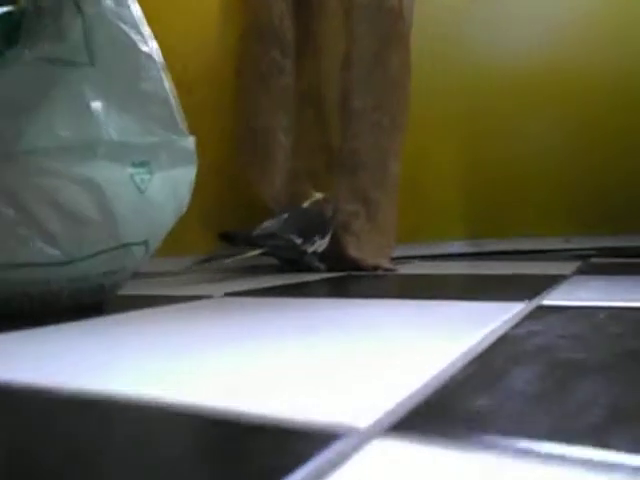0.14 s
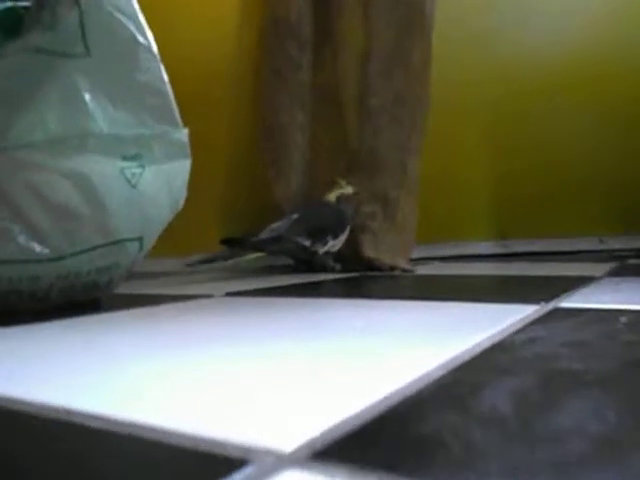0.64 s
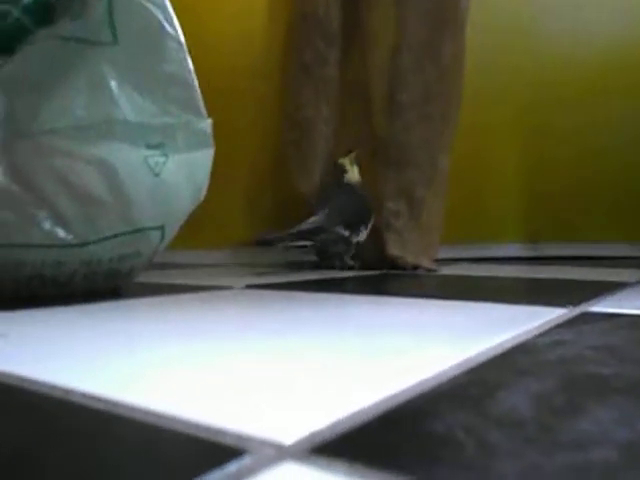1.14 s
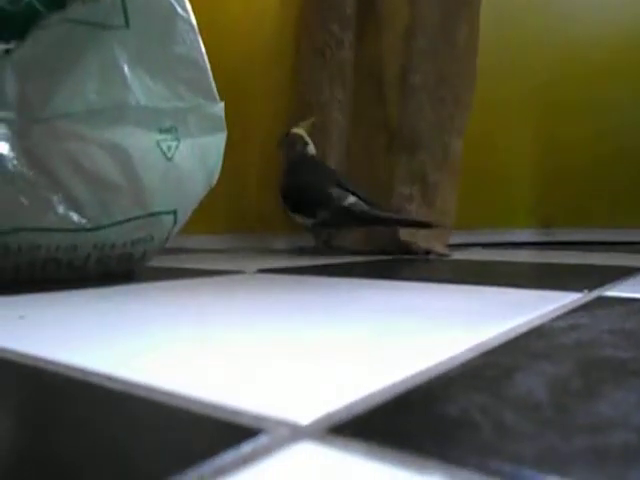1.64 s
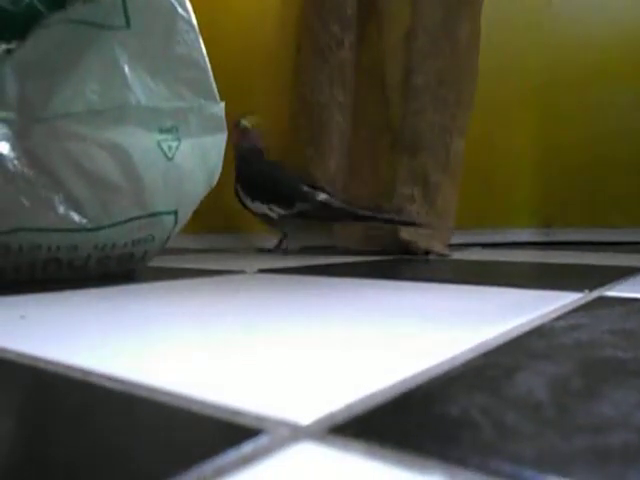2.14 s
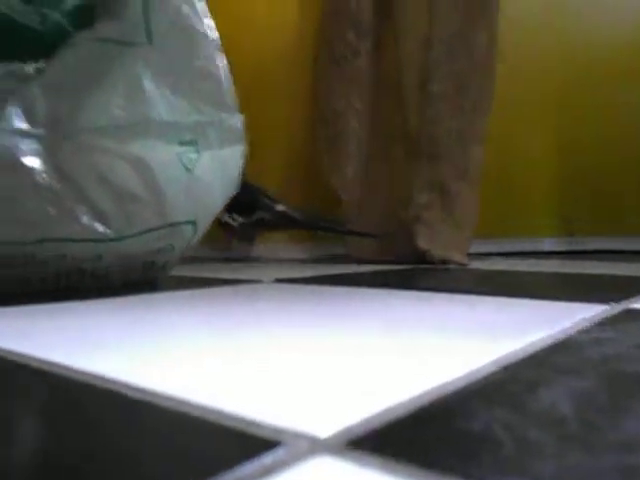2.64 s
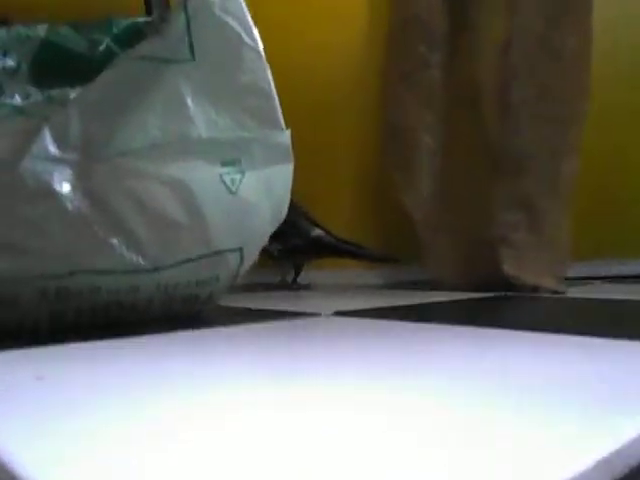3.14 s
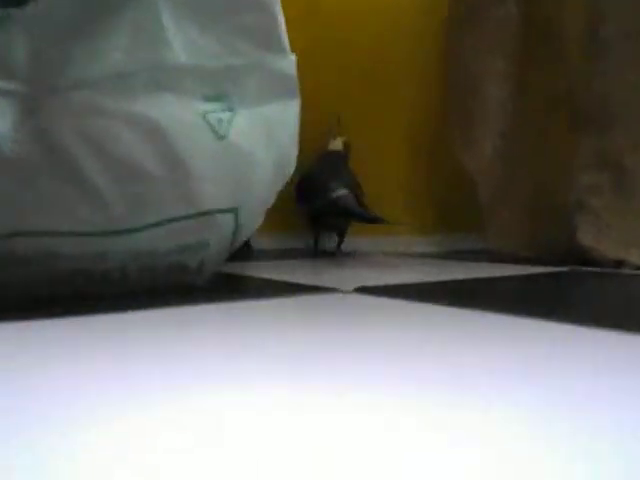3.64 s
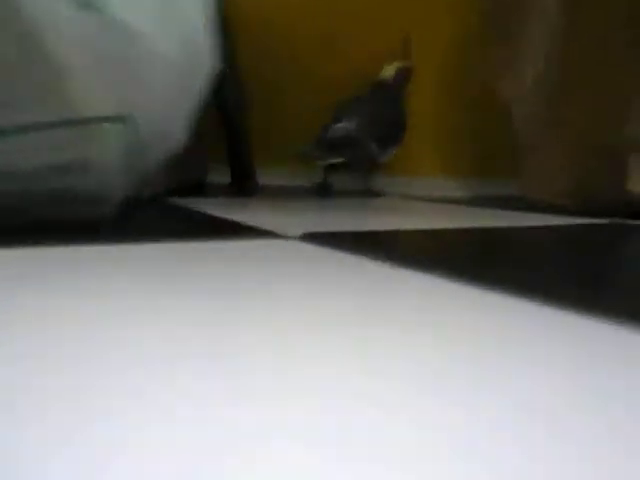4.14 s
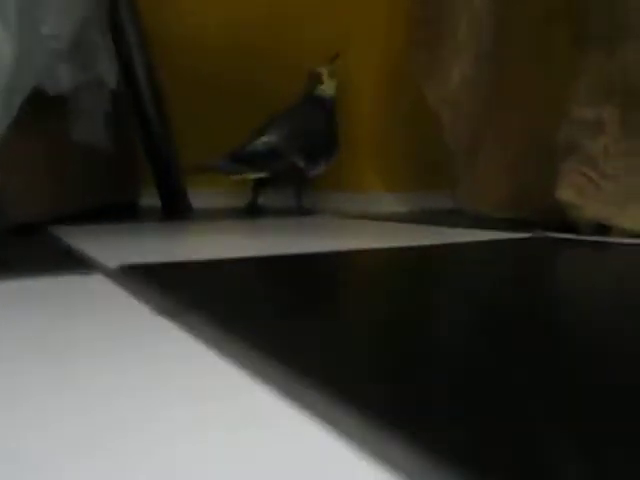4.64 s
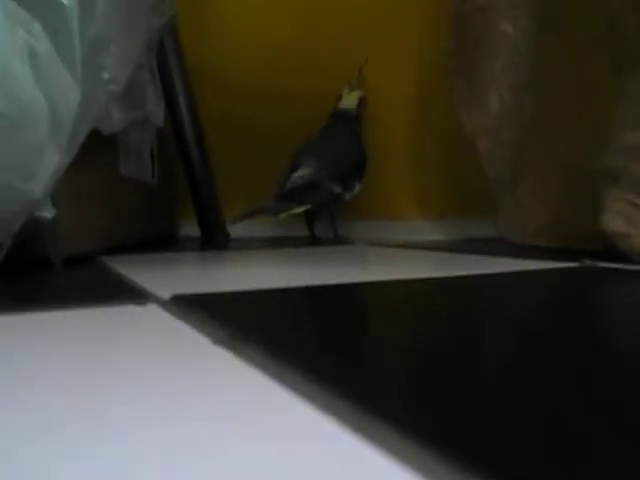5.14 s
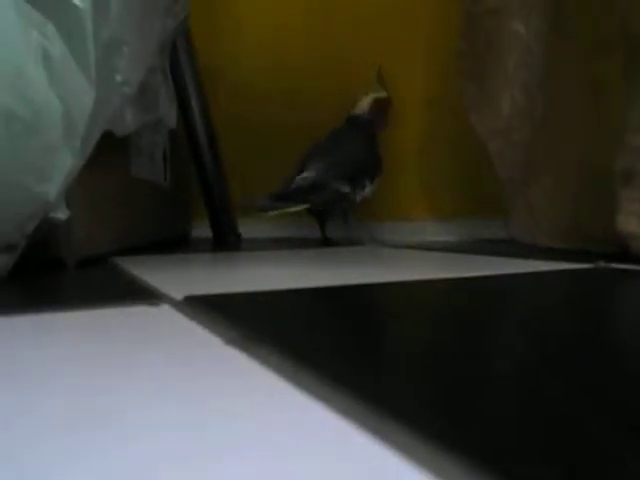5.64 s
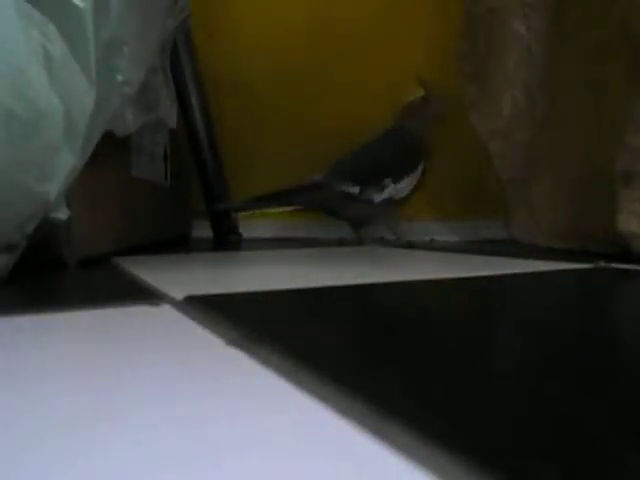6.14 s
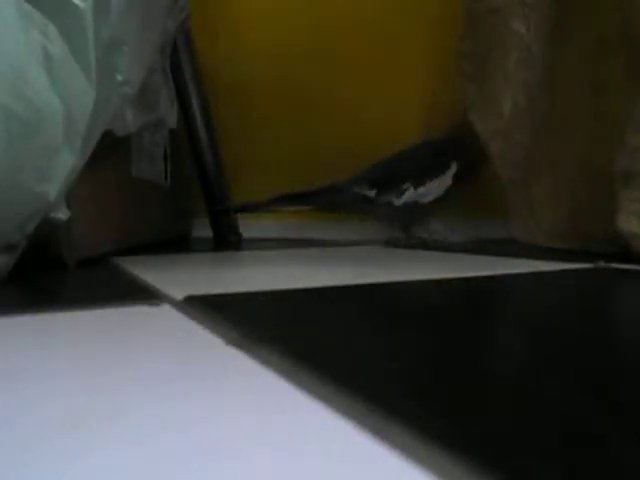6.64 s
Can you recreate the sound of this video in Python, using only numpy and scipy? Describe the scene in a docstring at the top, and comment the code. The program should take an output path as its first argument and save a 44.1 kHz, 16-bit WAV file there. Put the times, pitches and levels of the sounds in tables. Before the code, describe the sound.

A small, hard-walled tiled room with steady soft hiss, low rumble and a faint mains hum near 120 Hz. From 0.1 to 0.8 s light claw ticks and scratches patter, with small scuffs; a soft knock comes at about 1.25 s and a fainter one at 1.5 s. At 2.02 s the bird gives one shrill, hoarse call of about 0.2 s, gliding up from roughly 1.9 to 3 kHz and back down, with a brief bright echo. From 2.75 s the camera case scuffs, with a short stuttering burst of knocks around 3.0 s and bumps at 3.35 to 3.45 s. From 4.0 to 4.7 s it drags in loud, close, woody-plastic judders, sticking and slipping with brief pauses. Then it is quiet: weak rubs, a scuff and thin squeak around 5.3 to 5.55 s, and sparse faint claw ticks until 6.7 s.

```python
"""The case of a small camera is nudged and dragged by hand over a tiled floor: it scuffs, sticks and slips.
Slips are short pushes that ring damped case modes; scuffs, a faint squeak and rubbing fill in around them.
A pet bird patters over the tiles, its claws scraping in short bursts of the same case modes, and gives one
shrill call of gliding hoarse partials that rings in the bare room. Mains hum and coloured hiss lie under it."""
import sys
import numpy as np
from scipy import signal
from scipy.fft import rfft, irfft, next_fast_len
from scipy.io import wavfile
from scipy.ndimage import uniform_filter1d

SR = 44100
rng = np.random.default_rng(int(sys.argv[2]) if len(sys.argv) > 2 else 0)


def voltage_ratio(decibels):
    """Convert decibels (scalar or array-like) to amplitude ratios, 20 dB per decade."""
    exponent = np.asarray(decibels, float) / 20
    return 10 ** exponent


def waveform_to_disk(signal):
    """Save audio, clipped to [-1, 1], as 16-bit WAV at the path in sys.argv[1]."""
    frames = np.transpose(np.atleast_2d(signal))
    scaled = np.clip(frames, -1, 1) * 32767
    samples = np.round(scaled).astype(np.int16)
    wavfile.write(sys.argv[1], SR, samples)


N = 297675
T = np.arange(N) / SR


def unit(x):
    """Normalisation: scales a signal to an rms of one."""
    return x / np.sqrt(np.mean(x ** 2))


def column(tables, index, quiet=0.):
    """Linear interpolation: one column of several tables along time, quiet between them."""
    out = np.full(N, float(quiet))
    for table in tables:
        s, value = np.array(table, float)[:, [0, index]].T
        span = slice(int(s.min() * SR), int(s.max() * SR) + 1)
        out[span] = np.interp(T[span], s, value)
    return out


def flicker(rate_hz):
    """Smoothed noise: a slow random wander with a spread of one."""
    k = max(int(SR / rate_hz), 1)
    return unit(uniform_filter1d(uniform_filter1d(rng.standard_normal(N), k), k))


def oscillator(hz):
    """Phase accumulation: a sine whose phase is the running sum of its frequency."""
    return np.sin(2 * np.pi * np.cumsum(hz) / SR)


# Spectrum of the hiss and rumble, relative: frequency_hz [Hz], density_db [dB per Hz]
HISS_SPECTRUM = [(25, -10.5), (60, -5), (100, -0.5), (150, -3.5), (300, 0.5), (900, -3), (1700, -12),
                 (3400, -13.5), (7000, -18), (10000, -21), (12500, -35.5)]
# Mains hum before its waver: start_s [s], pitch_hz [Hz], level_db [dB rms]
HUM = [(0, 119.8, -58.5), (3, 119.3, -59), (5, 122.5, -56.5), (6.75, 117.4, -54.5)]


def room_tone():
    """Spectral shaping colours noise into soft hiss and rumble; a slightly wavering sine is the mains hum."""
    size = next_fast_len(N)
    bin_hz = np.arange(size // 2 + 1) * SR / size
    hz, db = np.transpose(HISS_SPECTRUM)
    colour = voltage_ratio(np.interp(np.log(bin_hz + 1), np.log(hz), db))
    hiss = unit(irfft(rfft(rng.standard_normal(size)) * colour, size)[:N])
    hiss = hiss * voltage_ratio(-56.5 + 0.28 * flicker(6))
    hum = oscillator(column([HUM], index=1) + 0.23 * flicker(5.0))
    hum_gain = voltage_ratio(column([HUM], index=2) + 0.27 * flicker(5.7))
    return hiss + np.sqrt(2) * hum * hum_gain


def room(x):
    """Reverberation: dense echoes off bare walls and tiles build up in milliseconds; the treble dies faster."""
    treble_t60_s, bass_t60_s, level_db = 0.34, 1.41 * 0.34, -2.5
    t = T[:int(.7 * SR)]
    full = rng.standard_normal(len(t)) * 1000. ** (-t / treble_t60_s)
    dull = signal.lfilter(*signal.butter(1, 5000., fs=SR), rng.standard_normal(len(t)))
    dull = dull * 1000. ** (-t / bass_t60_s)
    build_up = 1 - np.exp(-(t / 0.0022) ** 2)
    echoes = (full + 0.58 * dull) * build_up
    return voltage_ratio(level_db) * signal.oaconvolve(x, echoes / np.sqrt(np.sum(echoes ** 2)))[:N]


# Partials 2 to 5 of the call, relative before their wander: level_db [dB]
OVERTONES_DB = [1, -15.5, -18, -28.5]
# The bird's call; the beak is wide at both ends and narrows at the top. Columns, before the throat filter:
# start_s [s], pitch_hz [Hz], level_db [dB], overtones_db [dB to the fundamental], rasp_db [dB]
CALL = [(2.022, 1867, -52, -4.5, -64), (2.032, 1904, -26.5, 0, -37.5), (2.046, 1953, -22, 10.5, -42),
        (2.058, 1966, -13.5, 6.5, -42), (2.078, 2000, -20.5, 6, -50), (2.084, 2146, -18, 5.5, -42),
        (2.094, 2188, -18, 0, -39), (2.102, 2330, -19, -18, -38), (2.112, 2876, -15, -25, -43),
        (2.118, 2992, -8, -40.5, -43), (2.128, 2857, -25, -18, -42), (2.138, 2874, -14.5, -25, -43),
        (2.147, 2910, -24, -18.5, -39), (2.152, 2643, -16, -20, -31.5), (2.158, 2548, -19, -6, -39),
        (2.168, 2466, -14, 14.5, -38), (2.186, 2387, -15, -1.5, -38), (2.196, 2130, -11.5, 17, -33),
        (2.208, 1953, -14.5, 9, -35.5), (2.22, 1774, -19.5, 13, -35.5), (2.24, 1634, -32, 10, -46)]


def call():
    """Harmonic source and throat filter: five hoarse partials glide; rasping air fills the gaps between them."""
    hz = column([CALL], index=1) * (1 + .009 * flicker(500))
    phase = 2 * np.pi * np.cumsum(hz) / SR
    level = uniform_filter1d(voltage_ratio(column([CALL], index=2, quiet=-120)), size=90)
    wide = voltage_ratio(column([CALL], index=3))
    rasp = uniform_filter1d(voltage_ratio(column([CALL], index=4, quiet=-120)), size=90)
    overtones = np.zeros(N)
    # the higher the partial, the more it comes and goes
    for k, db in enumerate(OVERTONES_DB):
        gain = voltage_ratio(db + 1.5 * k * flicker(130))
        overtones += gain * np.sin((k + 2) * phase + .22 * k * flicker(700))
    voice = (np.sin(phase) + wide * overtones) / np.sqrt(1 + wide ** 2)
    # uneven cycles spread side bands around each partial
    hoarse = 1 + .24 * flicker(1300)
    air = signal.sosfilt(signal.butter(4, 1900., "high", fs=SR, output="sos"), rng.standard_normal(N))
    air = signal.lfilter(*signal.butter(1, 5000., fs=SR), air)
    # so small a throat passes little below the lowest note
    throat = signal.butter(8, 1600., "high", fs=SR, output="sos")
    return signal.sosfilt(throat, level * np.sqrt(2) * voice * hoarse + rasp * unit(air))


def decays(modes, t60_scale=0.58):
    """Modal impulse response: the decaying sines that one sharp blow sets off."""
    t = T[:SR // 10]
    return sum(voltage_ratio(db) * np.sin(2 * np.pi * hz * t) * 1000. ** (-t / (t60_scale * t60))
               for hz, db, t60 in modes)


def ring(x, modes):
    """Convolution: a set of modes driven by x."""
    return signal.oaconvolve(x, decays(modes))[:N]


def grit(spread_db):
    """Heavy-tailed noise: now and then a grain is much larger than the rest."""
    return rng.standard_normal(N) * voltage_ratio(spread_db * rng.exponential(size=N))


# Groups of case modes, low to high: frequency_hz [Hz], level_db [dB, relative],
# free_t60_s [s, before the damping scale]
CASE_BODY = [(189, -18.5, 0.02), (303, 3, 0.034), (395, -2.5, .025), (524, 0, 0.022), (670, -8, 0.02),
             (771, -2, 0.055)]
CASE_RING = [(1270, 6.5, 0.0067), (1730, 4, 0.015), (2080, 8, 0.01), (2270, -10.5, 0.034)]
CASE_EDGE = [(3250, 3.5, 0.0075), (4010, 5.5, 0.0038), (4960, -3.5, 0.0064)]
CASE_TICK = [(5630, -2, 0.0067), (6660, 2.5, 0.0052), (8060, -1.5, 0.003), (9900, -4.5, 0.004)]


def scrape():
    """Friction excitation: grit drives each group of modes; different modes come forward in turn."""
    groups = []
    for modes in (CASE_RING, CASE_EDGE, CASE_TICK, CASE_BODY):
        groups.append(sum(voltage_ratio(2.5 * flicker(22)) * ring(grit(1.8), [mode]) for mode in modes))
    # a soft rub pushes slowly, so it favours the lowest modes of the body
    groups[3] = signal.lfilter(*signal.butter(1, 450., fs=SR), groups[3])
    return [unit(x) for x in groups]


# Claws on tile: start_s [s], level_db [dB], scrape_s [s],
# thud_db [dB to level], treble_db [dB to level, before each treble group's offset]
STEPS = [(0.1323, -43, 0.0036, -20, 9), (0.313, -49.5, 0.006, 2, -7), (0.467, -55, 0.011, -1, 0),
         (0.522, -47.5, 0.008, -10, -2.5), (0.534, -57.5, 0.036, -12, 0), (0.6116, -45.5, 0.017, -26, -1.5),
         (0.6836, -45, 0.017, -8, -4), (0.711, -43, 0.0041, -11, -2.5), (0.715, -49, 0.026, -3, -4),
         (0.758, -51.5, 0.0075, 8, -7), (.9607, -51.5, 0.0047, 1, -21), (1.46, -56, 0.0042, -12, 5),
         (1.916, -47.5, 0.018, 2, -4.5), (1.9937, -40.5, 0.017, -1.5, -2), (2.178, -38, .018, 1, -7),
         (2.208, -37, .002, -3, -3), (2.24, -36, 0.03, -6, -19), (2.445, -42.5, 0.021, 7, -6.5),
         (3.122, -47, 0.0057, -7.5, -24), (3.197, -52.5, 0.0032, -3.5, -3), (3.3883, -35, 0.0062, 4, -4.5),
         (3.489, -35, 0.0067, 8.5, 0.5), (4.712, -30, 0.0031, -22, 4), (5.2236, -49.5, 0.004, 4.5, 7.5),
         (5.824, -44.5, 0.0034, -1.5, -4), (6.054, -47, .006, 0, -19), (6.2652, -56, 0.0023, -13, 5.5),
         (6.276, -50, 0.0048, -10.5, -13), (6.617, -61.5, 0.0038, -19, -2)]


def steps():
    """Structure-borne sound: each claw lands at once, scrapes and lifts; the tile carries it to the case."""
    gains = np.zeros((4, N))
    for s, db, length, thud_db, treble_db in STEPS:
        t = T - s
        shape = np.where(t > 0, np.exp(-(np.maximum(t, 0) / length) ** 3), 0)
        group_db = [db, db + treble_db - 4.5, db + treble_db - 3.5, db + thud_db]
        gains += np.outer(voltage_ratio(group_db), shape)
    return sum(uniform_filter1d(g, size=20) * x for g, x in zip(gains, scrape()))


# Faint squeak of the case before its wander: start_s [s], pitch_hz [Hz], level_db [dB rms]
SQUEAK = [(5.37, 1130, -70), (5.39, 1110, -52), (5.44, 1090, -51), (5.46, 1080, -68)]


def squeak():
    """Frequency and amplitude modulation: a thin tone made unsteady in pitch and level."""
    hz = column([SQUEAK], index=1) * (1 + .02 * flicker(150))
    gain = voltage_ratio(column([SQUEAK], index=2, quiet=-120) + 3.3 * flicker(90.8))
    return np.sqrt(2) * gain * oscillator(hz)


# The hand bears down on the case between these two times: start_s [s], end_s [s]
PRESSED_S = (4.03, 4.72)


def under_hand():
    """Boundary condition: true while the hand bears down on the case."""
    return (T > PRESSED_S[0]) & (T < PRESSED_S[1])


# Strokes of the case over the tile; the first and last rows are faint swells of background hiss:
# start_s [s], peak_s [s], end_s [s], scuff_db [dB], treble_db [dB to scuff], body_db [dB to scuff]
SWELLS = [(0, -0.005, 0.21, -59, -0.5, 8), (0.163, 0.174, 0.24, -41, -4.5, -21),
          (0.223, 0.234, 0.295, -44.5, -6.5, -4), (0.989, 1.178, 1.304, -52, -8.5, 10),
          (1.237, 1.262, 1.4, -49.5, -11, 7.5), (1.45, 1.51, 1.59, -52, -10, -1),
          (1.513, 1.533, 1.57, -47.5, 5.5, -5), (2.612, 2.635, 3.01, -53.5, -4.5, 5),
          (2.689, 2.712, 2.74, -61.5, -6, 18.5), (2.748, 2.819, 2.978, -34, -14, 1.5),
          (2.859, 2.915, 2.984, -39.5, 3.5, 7), (2.968, 2.973, 2.983, -35, -9, 1),
          (2.98, 3.019, 3.036, -34.5, -10, 1.5), (3.065, 3.066, 3.066, -30.5, -24.5, 13),
          (3.336, 3.34, 3.38, -40, -9, 14), (3.355, 3.39, 3.42, -45, -13, 8),
          (3.416, 3.48, 3.54, -47.5, -1, 4.5), (3.5, 3.56, 4.1, -61.5, 1, -3),
          (3.88, 3.966, 4.04, -51.5, 2, 2), (4.55, 4.58, 4.67, -39, 2, -12),
          (4.686, 4.688, 4.72, -25, -1, -4), (4.7, 4.714, 4.747, -33.5, -5.5, -2),
          (4.73, 4.749, 4.82, -51, -9.5, 7), (4.768, 4.815, 4.91, -46, -1.5, 10.5),
          (4.91, 4.937, 5.09, -52.5, -0.5, 8.5), (4.976, 4.978, 5.04, -59.5, -23, 15.5),
          (5.043, 5.067, 5.27, -54.5, -10.5, 5.5), (5.229, 5.228, 5.33, -55.5, 1.5, 0.5),
          (5.266, 5.265, 5.32, -48, 8.5, 0), (5.311, 5.312, 5.41, -39.5, 4.5, -4),
          (5.37, 5.382, 5.78, -54, -19, -5), (5.439, 5.441, 5.58, -45, -6, -4),
          (5.451, 5.501, 5.506, -37, -4, -14), (5.507, 5.512, 5.55, -33.5, -14, -14),
          (5.522, 5.547, 5.595, -38.5, -2, -13), (5.945, 6.2, 6.47, -65, 7, -1.5)]


def rub(blows):
    """Sliding friction: noise swells and falls in scuff, edge, hiss and body; slips under the hand add rubbing."""
    rise_power, fall_power = 0.92, 1.22
    gains = np.zeros((4, N))
    for start, peak, end, db, treble_db, body_db in SWELLS:
        rise = np.clip((T - start) / max(peak - start, 1e-3), 0, 1) ** rise_power
        fall = np.clip((end - T) / max(end - peak, 1e-3), 0, 1) ** fall_power
        # the edge follows the treble part of the way
        edge_db = -3 + 0.42 * treble_db
        gains += np.outer(voltage_ratio(db + np.array([0, edge_db, treble_db, body_db])), rise * fall)
    t = T[:SR // 20]
    # each slip moves the case briefly, with a weaker, slower tail
    slide = np.exp(-t / 0.0049) + 0.12 * np.exp(-t / 0.014)
    sliding = np.convolve(blows * under_hand(), slide)[:N]
    # scuff, edge, hiss and body, in dB relative to the slips
    gains += np.outer(voltage_ratio([-20.5, -30.5, -30.5, -26]), sliding)
    layers = sum(uniform_filter1d(g, size=60) * voltage_ratio(0.5 * flicker(40)) * x for g, x in zip(gains, scrape()))
    return voltage_ratio(2.06 * flicker(128)) * layers


# Quick runs of slips while the case is dragged, with pauses where it sticks; levels before their scatter:
# start_s [s], rate_hz [slips per s], level_db [dB], ring_db [dB to level]
JUDDER = [
    [(2.97, 170, -26, -7), (3.01, 170, -17, -9), (3.052, 170, -13, -11)],
    [(3.441, 260, -17, -10.5), (3.47, 260, -28.5, -11.5), (3.5, 270, -37, -10)],
    [(4.026, 230, -17.5, -14), (4.07, 230, -14.5, -13), (4.12, 240, -18, -13.5), (4.15, 230, -16, -11.5),
     (4.17, 240, -14, -10), (4.185, 240, -15.5, -11), (4.24, 220, -17, -11.5), (4.3, 130, -16.5, -8),
     (4.335, 130, -18.5, 5)],
    [(4.36, 140, -14.5, -8.5), (4.39, 180, -17.5, -7), (4.45, 150, -14, -6.5)],
    [(4.51, 150, -16, -8), (4.535, 210, -11, -9), (4.565, 250, -16, -8), (4.61, 160, -12, -9.5),
     (4.66, 120, -11.5, -7), (4.7, 180, -21.5, -7.5), (4.73, 150, -29, -22)],
]


def small_slips():
    """Stick-slip: uneven slips at the judder rate; a hard slip takes the place of any small one beside it."""
    rate, level_db = column(JUDDER, index=1), column(JUDDER, index=2, quiet=-120)
    ring_db = column(JUDDER, index=3)
    chance = rng.standard_normal((400, 3))
    # a slip falls due each time the summed rate passes the next uneven turn
    turns = np.cumsum(np.clip(1 + 0.195 * chance[:, 0], .5, 2))
    at = np.searchsorted(np.cumsum(rate) / SR, turns)
    keep = at < N
    at, chance = at[keep], chance[keep]
    s = T[at]
    rows = np.c_[s, level_db[at] + 2.2 * chance[:, 1], ring_db[at] + 2.5 * chance[:, 2]]
    apart = np.abs(s[:, None] - np.array(SLIPS)[:, 0]).min(axis=1) > .0032
    return rows[apart]


def thump(blows, free, damped):
    """Modal damping: blows ring the body freely, or damped under the hand."""
    pressed = under_hand()
    return sum(signal.oaconvolve(blows * when, k / k.max())[:N]
               for when, k in ((~pressed, free), (pressed, damped)))


# The hardest slips and knocks, before each layer's gain: peak_s [s], level_db [dB], ring_db [dB to level]
SLIPS = [(1.252, -18, -23), (2.838, -24, -8), (1.5355, -31, -17), (3.0224, -14, -9), (3.0347, -14, -11),
         (3.0508, -17, -10), (3.0671, -15, -8), (3.3361, -9, -9), (3.437, -10, -12), (4.001, -7, -4),
         (4.015, -8, -4), (4.0223, -11, -8), (4.1285, -9, -14), (4.1422, -10, -7), (4.2207, -10, -8),
         (4.229, -10, -10), (4.2602, -11, -9), (4.3072, -11, -8), (4.3188, -9, -4), (4.3468, -14, -7),
         (4.3578, -11, -10), (4.4538, -11, -6), (4.4634, -10, -4), (4.4737, -13, -6), (4.4868, -17, -7),
         (4.5018, -16, -2), (4.5344, -8, -7), (4.5878, -8, -2), (4.6577, -9, -5), (5.2575, -28, -24)]


def slips():
    """Elastic release: the case springs loose (a dip), catches (a peak) and rings; also gives the bare blows."""
    s, db, ring_db = np.r_[np.array(SLIPS), small_slips()].T
    push = np.r_[-.8 * np.hanning(int(.0007 * SR)), np.hanning(int(.0009 * SR))]
    free = np.convolve(push, decays(CASE_BODY, 1.))
    damped = np.convolve(push, decays(CASE_BODY, 0.42))
    at = (s * SR).astype(int) - np.argmax(free)
    hard, sharp, crisp, soft = np.zeros((4, N))
    np.add.at(hard, at, voltage_ratio(db + 2.0))
    np.add.at(sharp, at, voltage_ratio(db + ring_db))
    # a sharper slip reaches further into the treble
    np.add.at(crisp, at, voltage_ratio(db + 1.48 * ring_db))
    # a free case keeps more of its treble than one under the hand
    crisp *= np.where(under_hand(), 1, voltage_ratio(7))
    # slips that ring less than -8.5 dB push longer: over a span of 10.5 dB a low thud takes over
    np.add.at(soft, at, voltage_ratio(db + 2.5) * np.clip((-8.5 - ring_db) / 10.5, 0, 1))
    dull = thump(soft, free, damped)
    low_thud = voltage_ratio(4) * signal.lfilter(*signal.butter(2, 490, fs=SR), dull)
    thumps = thump(hard, free, damped) + low_thud - dull
    # rough contact after each blow sets off the upper modes
    t = T[:int(.005 * SR)]
    chatter = (t / 0.00095) * np.exp(-t / 0.00079)
    rough = np.sign(rng.standard_normal(N))
    rattle = np.zeros(N)
    for blows, modes, gain_db in ((sharp, CASE_RING, -14), (crisp, CASE_EDGE, -21), (crisp, CASE_TICK, -21)):
        rattle += voltage_ratio(gain_db) * ring(np.convolve(blows, chatter)[:N] * rough, modes)
    return thumps + rattle, hard


def scene():
    """Superposition: room tone, bird in the room and case against the floor, which reaches the room faintly."""
    bird = call()
    knocks, blows = slips()
    handling = knocks + rub(blows) + steps() + squeak()
    # between its groups of modes the case moves less, and it is too small for deep bass
    for hz in (1000., 2950.):
        handling = handling - 0.41 * signal.lfilter(*signal.iirpeak(hz, 5., fs=SR), handling)
    handling = signal.sosfilt(signal.butter(4, 120., "high", fs=SR, output="sos"), handling)
    echoes = room(bird + voltage_ratio(-27) * handling)
    return (bird + echoes + handling + room_tone())[None]


def roll_off(x):
    """The treble ends steeply here."""
    return signal.sosfilt(signal.butter(12, 12290, fs=SR, output="sos"), x)


def record(dry):
    """Transducer response: a small microphone with a treble dip and a steep top; loud peaks are squashed."""
    x = dry - .72 * signal.lfilter(*signal.iirpeak(7750., 16., fs=SR), dry)
    x = 1.04 * np.tanh(x / 1.177)
    x = signal.sosfilt(signal.butter(10, 10540, fs=SR, output="sos"), x)
    return roll_off(x)


dry = scene()
out = record(dry)
waveform_to_disk(out)
```